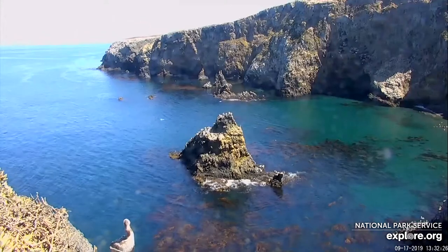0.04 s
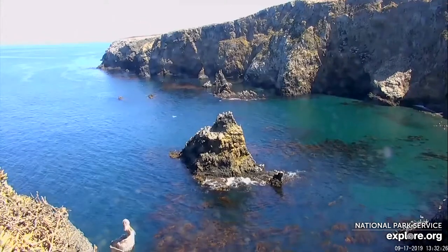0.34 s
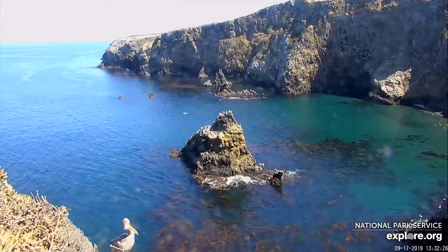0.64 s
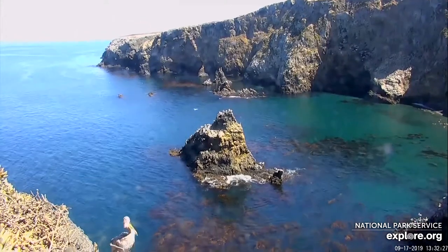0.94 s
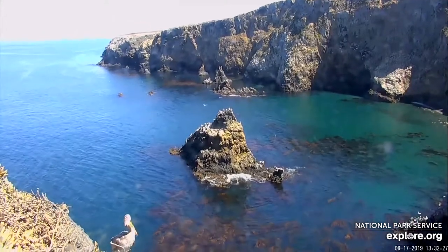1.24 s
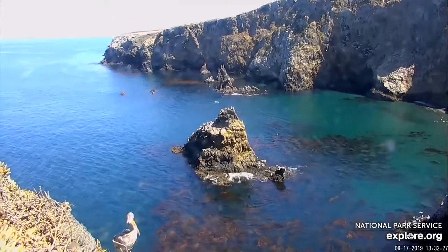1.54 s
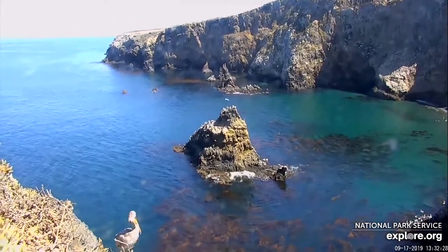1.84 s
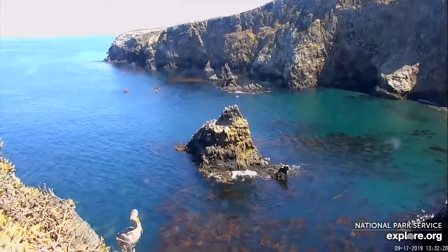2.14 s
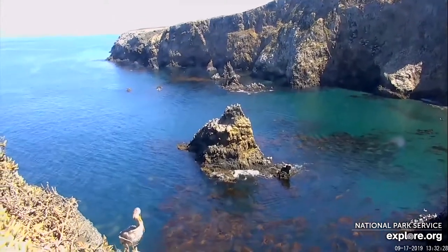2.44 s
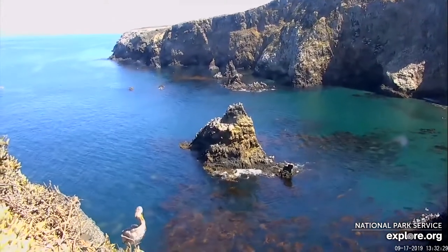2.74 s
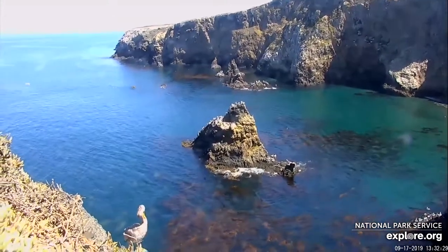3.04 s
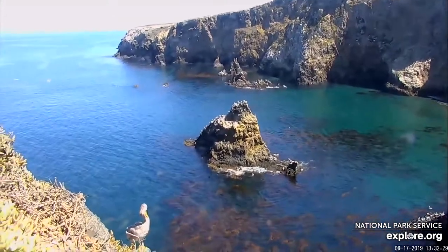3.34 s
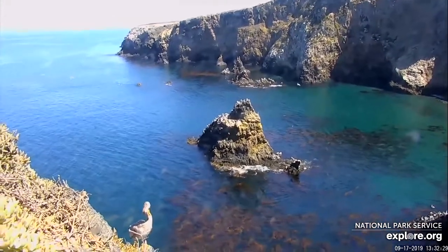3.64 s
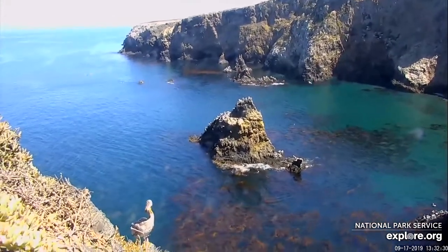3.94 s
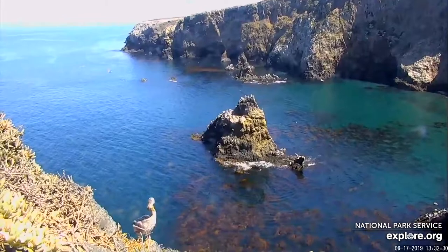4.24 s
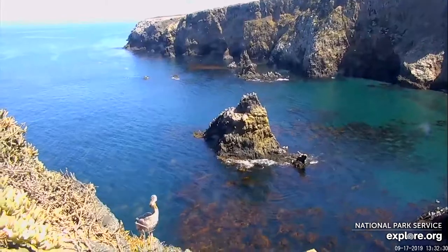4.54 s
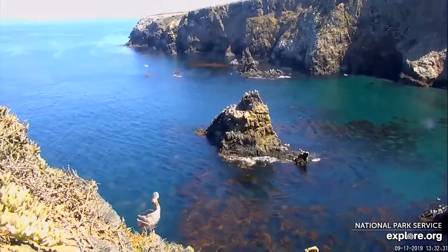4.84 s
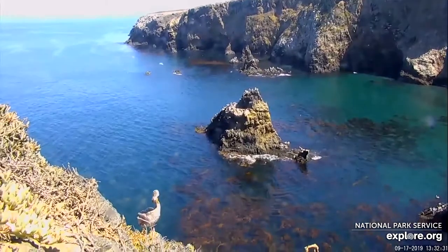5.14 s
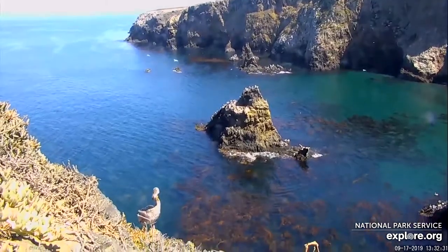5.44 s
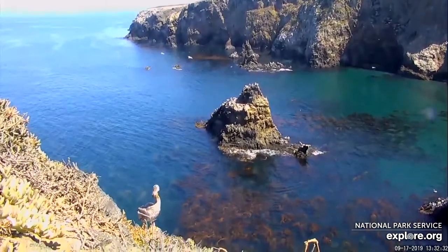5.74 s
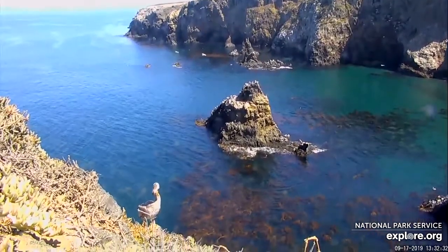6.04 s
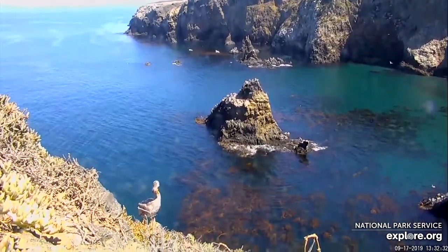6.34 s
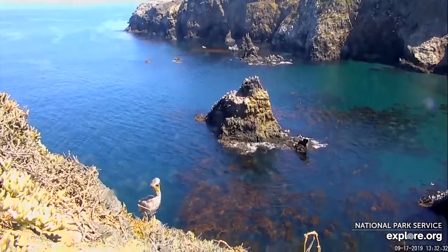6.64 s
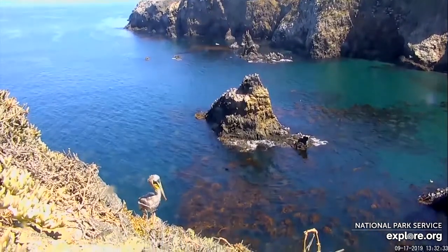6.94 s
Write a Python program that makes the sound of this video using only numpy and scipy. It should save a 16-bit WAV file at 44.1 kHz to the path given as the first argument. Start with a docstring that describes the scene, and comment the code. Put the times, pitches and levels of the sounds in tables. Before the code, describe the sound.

A low, gusty wind rumble over the soft wash and fizz of calm sea on rocks, with faint bird whistles and a hum.

```python
"""Small waves wash the rocks of a calm cove, and one splashes, heard from a cliff top.
Water churns, foam fizzes and falling drops tick. Light wind rumbles on the microphone's weatherproof
housing and rocks its mast; the housing rings near 2.8 kHz and colours the sound of the water.
A faint motor hum comes and goes, and a distant seabird pipes short whistles that echo off the cliffs."""
import sys
import numpy as np
from scipy import signal
from scipy.fft import rfft, irfft, next_fast_len
from scipy.io import wavfile
from scipy.ndimage import uniform_filter1d, map_coordinates

SR = 44100
rng = np.random.default_rng(int(sys.argv[2]) if len(sys.argv) > 2 else 0)


def unload_audio(sound):
    """Save the sound as a 16-bit wav file, at the path given as the first command line argument."""
    columns = np.transpose(np.atleast_2d(sound))
    # keep every value between -1 and 1, then stretch to whole-number steps
    steps = np.round(np.clip(columns, -1, 1) * 32767)
    wavfile.write(sys.argv[1], SR, steps.astype(np.int16))


N = 308259

# the slow swell of water on the rocks: time_s, churn_db, foam_db
WASH_LEVELS = [(0, -64, -63), (0.85, -64.5, -62.5), (1.45, -66, -63), (1.98, -65, -64), (2.22, -65, -62),
               (2.72, -64, -61), (3.2, -63, -61), (4.1, -62.5, -61), (4.95, -64, -62.4), (5.68, -63.5, -61),
               (6.4, -63.5, -63), (6.99, -64, -62)]
# small waves splashing: peak_s, slosh_db, spray_db, half_width_s
SPLASHES = [(0.117, -80, -66, .02), (0.665, -63, -62.5, 0.041), (0.716, -62, -57.5, 0.019),
            (0.751, -59, -58, .014), (0.771, -67, -56, 0.012), (0.789, -66, -59, 0.023),
            (0.837, -65, -57.5, 0.017), (1.293, -63.5, -70, 0.019), (1.376, -71, -66, 0.022),
            (1.44, -73.5, -64.5, 0.33), (2.51, -65.5, -62, 0.027), (2.677, -78, -62, 0.012),
            (4.5, -61.5, -73, .03), (5.642, -65, -69, 0.039), (5.692, -72, -66, 0.014),
            (5.87, -69, -60, 0.0071)]
# short swells of hiss near 2.7 kHz (foam, and at 4.73 s the rough edge of the bird's whistle):
# peak_s, level_db, half_width_s
HISS_SWELLS = [(2.242, -72, 0.19), (2.7, -64, 0.19), (3.36, -64, .04), (3.9, -64, 0.023),
               (4.11, -59.5, .025), (4.726, -62.5, 0.024), (5.63, -65, 0.028), (5.693, -57.5, 0.014)]
# single falling drops: start_s, level_db
DROP_TICKS = [(0.692, -66), (0.716, -70), (0.766, -62), (0.774, -65), (0.838, -77)]
# the tone of each noise, from low to high: frequency_hz, relative_db
CHURN_TONE = [(60, -15), (150, -12.5), (420, -8), (560, -1.5), (670, -2.5), (900, -2), (1050, 1.5),
              (1280, 0.5), (1500, -3.5), (1950, -2), (2400, -7), (3500, -45), (6000, -76)]
FOAM_TONE = [(900, -27), (1800, -8), (2350, 0), (2900, -2), (3250, -2.5), (3750, -8), (4500, -14.5),
             (5350, -16), (5750, -19), (7300, -21), (9000, -24.5), (15500, -28)]
SLOSH_TONE = [(200, 3), (500, -11), (800, -2), (1080, 4), (1500, -8), (2100, -0.5), (2800, -21),
              (6000, -37)]
SPRAY_TONE = [(600, -13), (1550, -10), (2400, 2.5), (2750, -3.5), (2950, 2), (3400, 3.5), (3800, -9.5),
              (4400, -9), (5500, -18.5), (8000, -25.5), (15000, -36)]
HISS_SWELL_TONE = [(1500, -18), (2400, -3), (2700, 3), (3000, -13), (3600, -22), (8000, -24), (15000, -45)]
DROP_TONE = [(1500, -8), (3400, -2), (4500, -7), (7500, -9), (11000, -15), (15500, -20)]
# where the housing rings: pitch_hz, width_hz, boost_db
HOUSING_RINGS = [(555, 50, 3), (770, 125, 8), (2761, 480, 13.5), (6660, 350, 8), (9000, 300, 3),
                 (10560, 330, 7), (12850, 360, 3), (14600, 350, 3)]

# strength of the breeze on the housing: time_s, gain_db
BREEZE_STRENGTH = [(0, -1.5), (0.7, -1.5), (1.6, -0.4), (2.8, 0), (3.4, 0.5), (4.0, -1), (4.6, 0),
                   (5.9, -1), (6.6, -3), (6.99, -1)]
# gusts that shove the mast: start_s, swing_db, swing_rate_hz, length_s
MAST_GUSTS = [(2.333, -50, 7.56, 0.79), (3.746, -37.5, 11.7, 0.33), (4.237, -46, 11.7, 0.17),
              (5.398, -49.5, 6.8, 0.26), (6.228, -44.5, 7, 0.11), (6.713, -37, 9.3, 0.13),
              (6.933, -41, 9.1, .06)]
# swirls of air that thump the housing: peak_s, level_db, pitch_hz, half_width_s
AIR_THUMPS = [(0.709, -48, 103, 0.019), (0.84, -46.5, 104, 0.01), (0.918, -43, 62, 0.0068),
              (1.398, -43.5, 64, 0.01), (1.491, -51.5, 96, 0.039), (1.599, -52, 94, 0.044),
              (1.831, -45, 85, 0.0074), (2.146, -39.5, 43.5, 0.018), (2.196, -44, 54.4, 0.018),
              (2.395, -47, 39, 0.035), (2.759, -48.5, 104, 0.032), (2.814, -46, 62, 0.016),
              (3.144, -54, 107, 0.03), (3.443, -45, 50, 0.012), (3.802, -51, 35.4, 0.038),
              (3.857, -52, 45, .014), (3.944, -46, 42, .02), (4.004, -54, 36, 0.02),
              (4.107, -46, 35.8, 0.014), (4.451, -53.5, 108, 0.015), (5.442, -49.5, 48.7, 0.021),
              (5.624, -47, 44.6, 0.015), (6.648, -46, 31.8, 0.049), (6.898, -48, 100.6, 0.025),
              (6.939, -51, 38, .02)]
# air rushing round the housing: time_s, level_db
RUSH_LEVELS = [(0, -72), (0.9, -72), (1.7, -71.5), (2.3, -74), (2.9, -72), (3.5, -72), (4.2, -71),
               (4.9, -74), (5.3, -73.5), (5.8, -73), (6.3, -74), (6.99, -72)]
# hollow puffs of air: peak_s, level_db, half_width_s
AIR_PUFFS = [(0.787, -80.5, 0.74), (0.782, -76.5, 0.11), (3.923, -72.5, 0.014), (4.013, -77, 0.014),
             (4.896, -67, 0.03), (5.71, -69, 0.025), (6.876, -73, 0.036)]
# the tone of the wind's rumble, the rushing air and the ringing mount: frequency_hz, relative_db
RUMBLE_TONE = [(10, -27.5), (24, -0.5), (46, -0.5), (60, -3), (75, -3), (95, -3.5), (120, -13.5),
               (150, -26), (190, -28), (500, -61), (1500, -100)]
RUSH_TONE = [(120, -30), (180, -9), (250, -3), (300, 1), (350, 0), (380, -8), (450, -12), (1000, -51)]
MOUNT_TONE = [(40, -45), (85, -10), (102, -7.5), (111, 5), (117, -4), (126, -14), (160, -27), (400, -69)]

# the motor's steady tones: pitch_hz, level_db
MOTOR_PITCHES = [(218.6, -82), (327.8, -83.5), (655.6, -74), (1031, -80.5)]
# how well the breeze carries the hum: time_s, gain_db
MOTOR_CARRY = [(0, -17), (0.4, -6), (0.85, -1), (1.35, -5), (2.0, -2.5), (2.9, -3), (4.0, -2), (7, -1)]
# the bird's whistles: start_s, length_s, start_hz, end_hz, level_db
BIRD_NOTES = [(0.38, 0.033, 3250, 3250, -71), (2.47, 0.03, 3170, 3290, -69),
              (4.686, 0.021, 2820, 2890, -64), (4.702, 0.032, 3290, 3340, -61.5),
              (4.74, 0.063, 3250, 3190, -70.5), (4.805, 0.045, 3180, 3100, -69),
              (5.479, 0.021, 5820, 6270, -78), (6.797, 0.036, 2914, 2760, -59)]
# the tone of the amplifier's hiss: frequency_hz, relative_db
HISS_TONE = [(100, 5), (5000, 3.5), (9000, -1.5), (12000, -4), (15500, -22)]
# its thin electrical whine: pitch_hz, level_db
WHINE_PITCHES = [(4887, -99), (5460, -100), (11837, -105)]

DROP_FADE_S = 0.025  # time to fade by 60 dB
RUMBLE_DB, RUMBLE_GUST_DB, MOUNT_DB = -57.5, 0.5, -60.5
SWAY_DB, SWAY_HZ, SWAY_WANDER = -57.5, 11.6, 0.1124  # wander is a share of the rate
GUST_RISE_S, LOPSIDED = 0.004, 0.085
NOTE_EDGE_S, ECHO_DB, ECHO_FADE_S = 0.0032, -8, 0.25  # the echo fades by 60 dB in this time
HISS_DB, TOP_HZ = -81.5, 15740


def surf():
    """Water churns on the rocks, foam fizzes over it, and small waves slosh and throw spray."""
    churn_db, foam_db = curves(WASH_LEVELS)
    ripples = wobble(7)  # these move both the churn and the foam
    churn_noise = housed(patchy(noise(CHURN_TONE), depth_db=1.0))
    churn = amp(churn_db + 0.28 + 0.25 * ripples) * churn_noise
    fizz = amp(0.36 * wobble(22) + 0.78 * wobble(170))  # bubbles burst in clumps
    foam_noise = housed(patchy(noise(FOAM_TONE), depth_db=0.42))
    foam = amp(foam_db + 0.4 * ripples) * unit(fizz * foam_noise)
    slosh = swells((s, db, width) for s, db, _, width in SPLASHES) * housed(noise(SLOSH_TONE))
    spray = swells((s, db, width) for s, _, db, width in SPLASHES) * housed(noise(SPRAY_TONE))
    return churn + foam + slosh + spray


def hiss_swells():
    """Short swells of hiss near 2.7 kHz: foam, and once the rough edge of the bird's whistle."""
    return swells(HISS_SWELLS) * housed(noise(HISS_SWELL_TONE))


def drops():
    """Drops fall back from the splash, each with a short bright tick."""
    t = clock()
    ticks = sum(amp(db - 60 * np.abs(t - s) / DROP_FADE_S) * (t >= s) for s, db in DROP_TICKS)
    return ticks * housed(noise(DROP_TONE))


def wind():
    """Air rocks the mast, rumbles on the housing, rushes round it, thumps it and rings its mount."""
    sway, force = mast()
    rumble = amp(RUMBLE_DB + RUMBLE_GUST_DB * force + 1.2 * wobble(14))
    rumble *= steady(noise(RUMBLE_TONE), span_s=0.25)
    airflow = amp(curves(RUSH_LEVELS)[0]) + swells(AIR_PUFFS)
    rush = airflow * amp(1.3 * wobble(26)) * steady(noise(RUSH_TONE), span_s=0.18)
    ringing = amp(MOUNT_DB - 0.7 * wobble(8.9)) * steady(noise(MOUNT_TONE), span_s=0.15)
    breeze = amp(curves(BREEZE_STRENGTH)[0])
    thumps = sum(amp(db) * swell(s, width) * np.cos(2 * np.pi * hz * (clock() - s))
                 for s, db, hz, width in AIR_THUMPS)
    return sway + breeze * (rumble + ringing) + rush + thumps


def mast():
    """The mast sways and gusts shove it into lopsided swings. Gives its motion and their force (0-1)."""
    cycles = SWAY_HZ * np.cumsum(1 + SWAY_WANDER * wobble(10)) / SR
    motion = amp(SWAY_DB) * unit(np.sin(2 * np.pi * cycles))
    force = np.zeros(N)
    for start_s, db, hz, length_s in MAST_GUSTS:
        t = np.maximum(clock() - start_s, 0)
        rise = 1 - np.exp(-t / GUST_RISE_S)
        shove = amp(db) * rise / (1 + (t / length_s) ** 8)  # holds, then dies away
        phase = 2 * np.pi * hz * t
        motion += shove * (np.sin(phase) + LOPSIDED * np.sin(2 * phase))
        force += shove
    return motion, force / force.max()


def motor():
    """A small motor hums, wavering a little in speed and strength."""
    wavering_time = np.cumsum(1 + 0.00046 * wobble(4.05)) / SR
    tones = sum(amp(db + 0.25 * wobble(4.8)) * np.sin(2 * np.pi * hz * wavering_time)
                for hz, db in MOTOR_PITCHES)
    return np.sqrt(2) * amp(curves(MOTOR_CARRY)[0]) * tones


def seabird():
    """Short thin whistles start sharply, waver over the distance and scatter off the cliffs."""
    calls = np.zeros(N)
    for start_s, length_s, start_hz, end_hz, db in BIRD_NOTES:
        progress = np.clip((clock() - start_s) / length_s, 0, 1)
        pitch_hz = (start_hz + (end_hz - start_hz) * progress) * (1 + 0.00436 * wobble(150))
        fade = np.minimum(np.minimum(progress, 1 - progress) * length_s / NOTE_EDGE_S, 1)
        whistle = np.sqrt(2) * np.sin(2 * np.pi * np.cumsum(pitch_hz) / SR)
        calls += amp(db + 1.4 * wobble(90)) * fade * whistle
    t = np.arange(SR // 2) / SR
    tail = rng.standard_normal(len(t)) * np.exp(-np.log(1000) * t / ECHO_FADE_S)
    echo = signal.fftconvolve(calls, tail / np.linalg.norm(tail))[:N]
    return calls + amp(ECHO_DB) * echo


def amplifier():
    """The microphone's amplifier adds a faint hiss and whine."""
    hiss = amp(HISS_DB) * patchy(noise(HISS_TONE), depth_db=3.5)
    whine = sum(amp(db) * np.sin(2 * np.pi * hz * clock()) for hz, db in WHINE_PITCHES)
    return hiss + np.sqrt(2) * whine


def housed(x):
    """The hollow in front of the microphone boosts the pitches it rings at; the result has strength 1."""
    def boost_db(hz):
        return sum(db / (1 + (2 * (hz - centre) / width) ** 2) for centre, width, db in HOUSING_RINGS)
    return unit(filtered(x, lambda hz: amp(boost_db(hz))))


def amp(db):
    """Turn decibels into a multiplier."""
    return 10 ** (np.asarray(db) / 20)


def unit(x):
    """Scale a sound to an average strength (rms) of 1."""
    return x / np.sqrt(np.mean(x ** 2) + 1e-20)


def clock():
    """The time of each sample, in seconds."""
    return np.arange(N) / SR


def curves(rows):
    """Join a table's points with straight lines: one curve for each column after the time."""
    times, *columns = np.transpose(rows)
    return [np.interp(clock(), times, column) for column in columns]


def swell(peak_s, half_width_s):
    """A smooth rise and fall, down to 37% at half_width_s either side of the peak."""
    return np.exp(-((clock() - peak_s) / half_width_s) ** 2)


def swells(rows):
    """Add up one swell for each row of peak_s, level_db, half_width_s."""
    return sum(amp(db) * swell(s, width) for s, db, width in rows)


def wobble(rate):
    """A smooth curve through `rate` random values a second."""
    return map_coordinates(rng.standard_normal(int(N * rate / SR) + 4), [clock() * rate])


def filtered(x, gain_at):
    """Multiply each frequency in x by gain_at(hz)."""
    size = next_fast_len(N + SR // 2)
    return irfft(rfft(x, size) * gain_at(np.fft.rfftfreq(size, 1 / SR)), size)[:N]


def noise(tone):
    """Noise of strength 1, shaped by a tone table."""
    points_hz, db = np.transpose(tone)
    def gain_at(hz):
        return amp(np.interp(np.log(hz + 1), np.log(points_hz + 1), db))
    return unit(filtered(rng.standard_normal(N), gain_at))


def patchy(x, depth_db):
    """Let nearby bands of pitch swell and fade on their own."""
    bands = signal.stft(x, nperseg=512)[2]
    patches = uniform_filter1d(rng.standard_normal(bands.shape), size=8, axis=0)  # smooth across pitch
    patches = uniform_filter1d(patches, size=14, axis=1)  # and across time
    return unit(signal.istft(bands * amp(depth_db * unit(patches)), nperseg=512)[1][:N])


def steady(x, span_s):
    """Even out loudness changes slower than span_s."""
    return x / np.sqrt(np.abs(uniform_filter1d(x ** 2, int(span_s * SR))) + 1e-9)


def scene():
    """All the sounds meet at one microphone."""
    return (surf() + hiss_swells() + drops() + wind() + motor() + seabird() + amplifier())[None]


def record(dry):
    """Cut away all treble above TOP_HZ."""
    return filtered(dry[0], lambda hz: hz < TOP_HZ)[None]


dry = scene()
out = record(dry)
unload_audio(out)
```